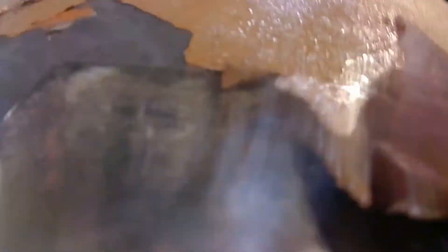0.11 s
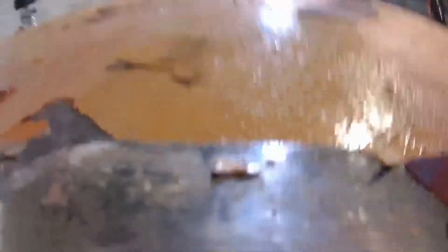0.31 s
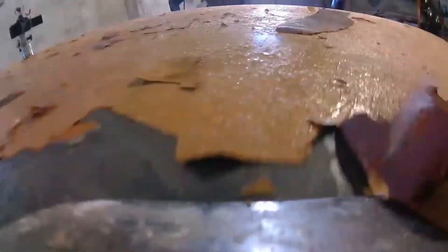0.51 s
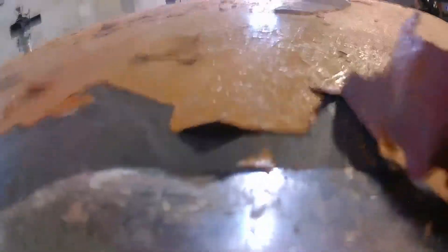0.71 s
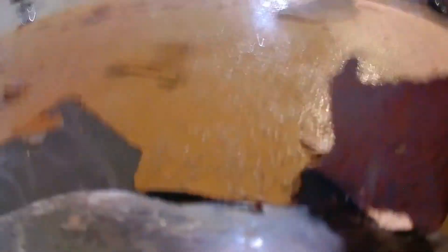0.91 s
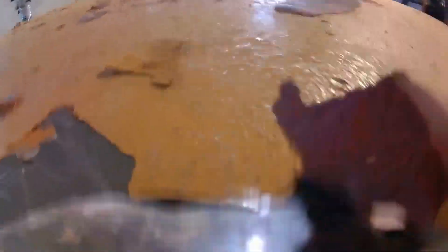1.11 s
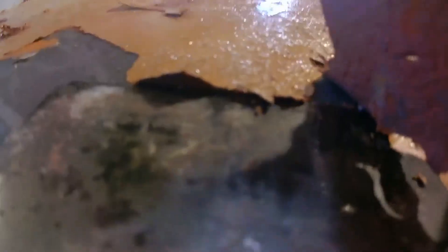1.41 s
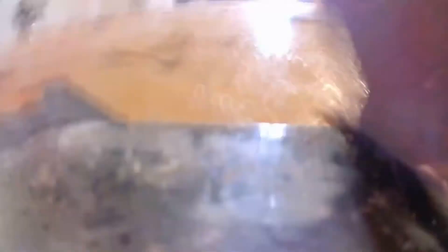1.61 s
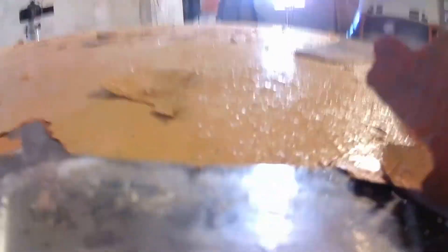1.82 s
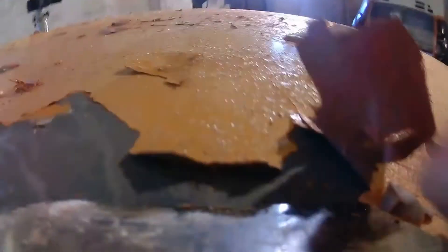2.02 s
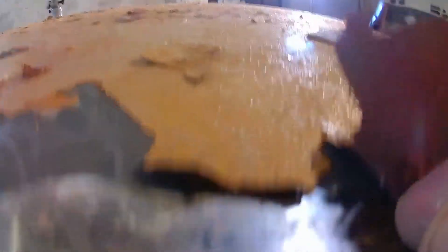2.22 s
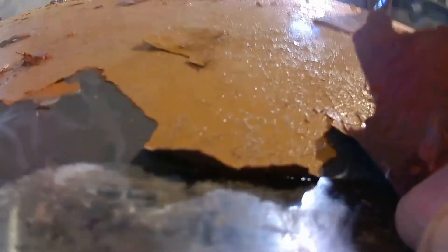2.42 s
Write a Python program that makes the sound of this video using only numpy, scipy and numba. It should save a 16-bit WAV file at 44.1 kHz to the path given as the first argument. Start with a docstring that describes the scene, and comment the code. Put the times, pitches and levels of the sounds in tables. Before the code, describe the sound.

A wide metal scraper shoved in short rough strokes over a steel car roof, chipping old paint

```python
"""A wide metal scraper is shoved in four short strokes over a steel car roof, chipping off old paint:
random fractures excite the modes of blade and panel while the edge catches, slips and judders.
Snaps are decaying noise bursts, knocks are damped oscillations, and groans are rough gliding tones.
Soft rubbing and handling rumble lie beneath. The microphone rides on the tool, so jolts reach it
directly and the strong ones overload it."""
import sys
import numpy as np
from scipy import signal
from scipy.fft import rfft, irfft
from scipy.io import wavfile
from scipy.ndimage import uniform_filter1d
from numba import njit

SR = 44100
rng = np.random.default_rng(int(sys.argv[2]) if len(sys.argv) > 2 else 0)


def wav_record(signal):
    """Record a signal, one row per channel, as 16-bit PCM in the file named by sys.argv[1]."""
    frames = np.transpose(np.atleast_2d(signal))
    bounded = np.clip(frames, -1, 1)
    # unit amplitude maps onto the largest positive 16-bit level
    quanta = np.round(bounded * 32767).astype(np.int16)
    wavfile.write(sys.argv[1], SR, quanta)


N = 112455
T = np.arange(N) / SR

# Levels in the tables are relative: trims, colouring and overload follow.
# Light sliding of the blade: (time [s], rubbing level [dB], handling rumble level [dB])
SLIDING_LEVELS = [(0,-59,-56),(.02,-61,-39),(.032,-52,-39),(.11,-50,-42),(.145,-42,-41),(.19,-47,-45),(.38,-63,-67),(.95,-74,-41),(.98,-36,-24),(1.055,-42,-31),(1.1,-68,-44),(1.17,-64,-55),(1.195,-49.5,-23),(1.27,-48,-36.5),(1.34,-55,-52),(1.375,-55.5,-49),(1.415,-48.5,-43),(1.48,-65,-54.5),(1.535,-51,-36.5),(1.555,-41.5,-38),(1.62,-49.5,-42.5),(2.33,-63,-42.5),(2.37,-64.5,-48),(2.44,-62,-50.5),(2.48,-53,-47),(2.55,-59,-54)]
# Groans of the roof panel in the second and third strokes, one list each:
# (time [s], pitch [Hz], level [dB])
PANEL_GROANS = [
    [(.47,400,-61),(.494,366,-22.5),(.51,328,-50),(.53,299,-22),(.555,293,-29.5),(.6,266,-30),(.635,286.6,-28),(.66,280,-27),(.7,264,-65)],
    [(2.045,270,-30),(2.058,296.6,-42),(2.082,417,-28.5),(2.11,440,-49)],
]
# Jolts of the tool against the roof:
# (time [s], level [dB], pitch [Hz], t60 [s], roof ring level [dB])
TOOL_KNOCKS = [(0.15,-29,160,0.15,-61),(0.201,-6.5,174.8,0.08,-19),(0.22,-10,83.4,0.22,-20.5),(0.603,-18,165,0.036,-37),(0.626,-11,114,0.049,-33),(0.795,-18.5,140,0.14,-34),(0.852,-7,130,0.043,-16),(0.872,-4,69.6,0.082,-66),(.992,15,227,0.024,-16),(1.021,-4.5,140,0.027,-28),(1.211,2,251.5,0.027,-28.5),(1.224,-15.5,75,0.036,-60),(1.247,-24,370,0.052,-53),(1.273,-20.5,80,0.058,-46),(1.59,-10.5,131,0.07,-38),(1.678,-3.5,174,0.02,-17),(2.072,-17.5,200,0.042,-21.5),(2.269,-3.5,125,.03,-37.5),(2.32,-27,80,0.11,-43.5),(2.487,-31.5,90,.14,-62)]
# Snapping flakes and clicks of the edge on bare steel: (time [s], level [dB], band centre [Hz])
FLAKE_SNAPS = [(0.028,-33.5,3660),(0.203,-11,4040),(0.332,-26.5,2570),(.603,-25,1770),(0.62,-9.5,3740),(0.625,-34,3240),(0.986,-25.5,4600),(1.024,-30,1500),(1.188,-21.5,6050),(1.505,-38,4550),(1.548,-32,2480),(1.588,-18,1400),(1.639,-25.5,2200),(1.66,-24,2400),(1.827,-24,2000),(1.836,-22.5,1480),(1.847,-22,1980),(2.073,-21.5,1500),(2.083,-37,1210),(2.167,-29.5,1910)]
# Scraping strokes, one list each:
# (time [s], paint grit level [dB], roof panel level [dB], judder level [dB])
STROKE_LEVELS = [
    [(0.19, -33, -41, -52), (0.204, -27, -39, -12), (0.218, -32, -23, -40), (0.262, -27, -22, -23),
     (0.284, -29.5, -41, -23), (0.294, -31, -29.5, -22), (0.314, -39, -50, -30.5), (0.33, -40, -33, -30),
     (0.354, -38, -54, -42), (0.374, -55, -47, -50), (0.382, -62, -39, -65), (0.39, -40, -58, -65)],
    [(0.39, -51, -40, -54), (0.456, -37.5, -39, -39), (0.488, -31, -28.5, -31), (0.598, -36, -34.5, -26),
     (0.628, -27, -25, -26), (0.648, -35.5, -41, -26.5), (0.698, -38.5, -40, -37), (0.798, -27.5, -29, -16),
     (0.806, -24, -20, -23), (0.84, -23.5, -28.5, -20), (0.874, -30.5, -43, -9.5), (0.886, -55, -52, -15),
     (0.94, -50.5, -42, -73)],
    [(1.625, -38, -35, -30), (1.649, -35.5, -33, -42), (1.683, -29, -34, -16), (1.733, -21.5, -20, -15.5),
     (1.771, -36, -48, -19.5), (1.797, -41, -47, -51), (1.845, -41, -30, -52), (1.881, -40, -52, -65),
     (1.917, -30, -28.5, -37.5), (1.997, -25, -30, -50), (2.035, -44, -42, -57), (2.083, -33.5, -53, -33),
     (2.13, -61, -81, -60)],
    [(2.13, -41.5, -48, -39), (2.158, -47.5, -39, -36), (2.168, -30.5, -32, -28), (2.178, -47, -28, -27.5),
     (2.202, -33.5, -37, -49), (2.228, -29, -29, -28), (2.254, -26.5, -25.5, -44),
     (2.27, -29.5, -25.5, -13), (2.286, -50, -56, -29.5), (2.304, -54.5, -52, -60), (2.338, -55, -58, -53),
     (2.36, -82, -65, -61)],
]
# Two narrow edge resonances that shift with the blade's angle:
# (time [s], first frequency [Hz], second frequency [Hz], level of the second [dB])
EDGE_RESONANCES = [(.205,1380,3900,-9),(.24,1360,2940,-18),(.28,1950,4300,-9),(.48,2280,4190,-3.5),(.53,2540,3960,-4),(.63,2580,4220,-3.5),(.7,1513,4300,-27),(.86,1390,4100,-18),(1.7,1950,4100,-1),(1.76,1450,2760,-24),(1.86,1330,4040,5),(1.919,2050,4200,-3.5),(1.95,2300,4130,-3),(1.97,2670,3350,-11),(2.0,2570,3380,-2),(2.18,2436,1420,-31),(2.26,2300,1510,-4)]
# Ringing modes of the blade: (frequency [Hz], level [dB], t60 [s])
BLADE_MODES = [(1364,-5,0.03),(1472,7,0.042),(1598,-20,0.3),(1636,-11,0.2),(1917,9.5,0.17),(2122,7,0.07),(2155,6,0.11),(2545,-5,0.088),(2758,6.5,0.12),(2933,-18,0.027),(3250,1.5,0.079),(4257,-5.5,0.12),(5370,13,0.03),(5840,15.5,0.15)]
# Ringing modes of the roof panel: (frequency [Hz], level [dB], t60 [s])
PANEL_MODES = [(390,-1.5,0.031),(568,-3.5,0.088),(687.4,-5.5,0.084),(832,0.5,0.056),(914,-7,0.062),(1012.5,3,0.08),(1204,-6,0.13),(1318,-0.5,0.085)]
# Spectrum of breaking paint: (frequency [Hz], spectral density [dB])
GRIT_COLOUR = [(150,-16),(500,-4),(1050,-3.5),(1400,6.5),(1780,-8),(2400,-2),(3100,-0.5),(4400,-3),(5100,-10.5),(5800,-23.5),(6300,-14),(10000,-24),(12000,-21),(15500,-46)]
# Spectrum of soft rubbing: (frequency [Hz], spectral density [dB])
RUB_COLOUR = [(200,11),(450,0.5),(1050,0),(1500,9),(1790,-13),(2050,-4),(3050,-1),(3350,-7),(3650,1),(4400,0),(5200,-15),(6300,-23),(12000,-20.5),(15500,-37)]
# Spectrum of the roof panel: (frequency [Hz], spectral density [dB])
ROOF_COLOUR = [(100,-14.5),(280,2),(450,7.5),(700,-3),(950,-6),(1400,-1),(1900,-28),(5000,-40.5)]
# Spectrum of the tool's low shaking: (frequency [Hz], spectral density [dB])
JUDDER_COLOUR = [(15,-32),(35,-4),(70,1),(120,4.5),(200,-3),(300,-12),(500,-29.5),(1500,-72)]
# Microphone response, weak in one treble band: (frequency [Hz], gain [dB])
MICROPHONE_RESPONSE = [(6380,0),(6470,-11),(6700,-17),(9400,-18),(9600,0),(13000,0),(15500,-5)]
# Stereo spread: (frequency [Hz], side relative to mid [dB])
STEREO_WIDTH = [(100,-62.5),(2500,-57),(5000,-20.5),(8000,-6.5),(12000,-14),(15000,4.5)]

GRIT_DB, RASP_DB, ROOF_DB, JUDDER_DB = 1, -3.5, -1, -3   # trims of the scraping layers
RUB_DB, HANDLING_DB = 1.5, -4.5   # trims of the sliding layers
BLADE_DB, BLADE_WASH_DB, BLADE_WASH_T60_S = -7, 6, 0.085   # modes and wash of the blade
PANEL_DB, ROOF_WASH_DB, ROOF_T60_S = -20, -8.5, 0.093   # modes and wash of the roof panel
GRAINS_PER_S, GRAIN_SPREAD_DB = 2400, 3   # tiny fractures of the paint
CATCH_HZ, CATCH_DB = 130, 3   # corner rate and spread of the catching and slipping
RASP_WIDTH_HZ = 144
GROAN_WANDER, GROAN_ROUGH_DB = 0.019, 2   # pitch spread as a fraction, level spread
SNAP_DECAY_S, SNAP_DB, SNAP_RING_DB = 0.0016, 1, -2
KNOCK_ATTACK_S, KNOCK_LOW_CUT_HZ = 0.0012, 63
OVERTONE_RATIO, OVERTONE_DB = 1.703, -11.5
ECHO_S, ECHO_SHARE = 0.001182, 0.48   # median delay and gain of waves from the blade's far end
ECHO_WANDER, ECHO_WANDER_HZ = 0.2, 3.08   # spread of the log delay and its corner rate
OVERLOAD = 0.2   # amplitude ceiling of the microphone
SCATTER_S, CUTOFF_HZ = 0.04, 15700


def from_db(db):
    """Logarithmic level: 20 dB is a factor of ten in amplitude."""
    return 10 ** (np.asarray(db) / 20)


def rms_one(x):
    """Power normalisation: the root mean square becomes 1."""
    return x / np.sqrt(np.mean(x ** 2) + 1e-20)


def energy_one(x):
    """Energy normalisation: a unit-energy response keeps the power of white noise."""
    return x / np.sqrt(np.sum(x ** 2))


def levels(rows):
    """Amplitude envelopes: levels are interpolated in dB, with silence outside the rows."""
    s, *columns = np.transpose(rows)
    inside = (T >= s[0]) * (T < s[-1])
    return [from_db(np.interp(T, s, column)) * inside for column in columns]


def through(x, response):
    """Linear superposition: a sound is convolved with a response."""
    return signal.fftconvolve(x, response)[:N]


def colour(points, size=8192):
    """Minimum phase: a folded cepstrum gives a causal response with the given spectrum."""
    hz, db = np.transpose(points)
    grid = np.maximum(np.arange(size // 2 + 1) * SR / size, 1)
    magnitude = from_db(np.interp(np.log(grid), np.log(hz), db))
    cepstrum = irfft(np.log(magnitude))
    cepstrum[1:size // 2] *= 2
    cepstrum[size // 2 + 1:] = 0
    return irfft(np.exp(rfft(cepstrum)))


def equalise(x, points):
    """Zero-phase filtering: the spectrum is scaled and its phase is kept."""
    hz, db = np.transpose(points)
    grid = np.arange(N + 1) * SR / (2 * N)
    gain = from_db(np.interp(grid, hz, db))
    return irfft(rfft(x, 2 * N) * gain)[:N]


def drift(rate):
    """Low-pass noise: a double pole smooths a random wander, scaled to spread 1."""
    r = np.exp(-2 * np.pi * rate / SR)
    noise = rng.standard_normal(N + SR)
    return rms_one(signal.lfilter([1], [1, -2 * r, r * r], noise)[SR:])   # drop the run-in


def sheet(modes, modes_db, wash_t60, wash_db):
    """Modal superposition in sheet steel: contact, strong modes and a dying wash of weak ones."""
    t = T[:SR // 3]
    wash = energy_one(rng.standard_normal(len(t)) * from_db(-60 * t / wash_t60))
    response = from_db(wash_db) * wash
    response[0] += 1   # the direct contact
    rings = sum(from_db(db - 60 * t / t60) * np.cos(2 * np.pi * hz * t) for hz, db, t60 in modes)
    return energy_one(energy_one(response) + from_db(modes_db) * energy_one(rings))


def grains():
    """Random impulse process: tiny fractures at random moments, mostly small, a few large."""
    spread = np.minimum(rng.exponential(1, N), 4)
    sizes = from_db(GRAIN_SPREAD_DB * spread) * rng.choice([-1, 1], N)
    return rms_one(sizes * (rng.random(N) < GRAINS_PER_S / SR))


def rumble(size=900):
    """Coloured noise of constant power: low shaking divided by its own running rms."""
    x = through(rng.standard_normal(N), colour(JUDDER_COLOUR))
    return x / np.sqrt(uniform_filter1d(x ** 2, size) + 1e-20)


def sliding(blade):
    """Light friction: fine grains excite the unloaded blade and the handle rumbles."""
    rub, handling = levels(SLIDING_LEVELS)
    rubbing_response = energy_one(through(blade, colour(RUB_COLOUR)))
    rubbing = through(rub * grains(), rubbing_response)
    return from_db(RUB_DB) * rubbing + from_db(HANDLING_DB) * handling * rumble()


def groan(rows):
    """Stick-slip oscillation: the panel is held in a rough, gliding note."""
    s, hz, db = np.transpose(rows)
    pitch = np.interp(T, s, hz) * (1 + GROAN_WANDER * drift(CATCH_HZ))
    gain, = levels(np.transpose([s, db]))
    roughness = from_db(GROAN_ROUGH_DB * drift(CATCH_HZ))
    return gain * roughness * np.sin(2 * np.pi * np.cumsum(pitch) / SR)


def knocks(roof):
    """Damped oscillation: each jolt swings the tool and leaves the roof ringing."""
    swing, ring = np.zeros(N), np.zeros(N)
    for s, db, hz, t60, ring_db in TOOL_KNOCKS:
        age = np.maximum(T - s, 0)
        attack = 1 - np.exp(-age / KNOCK_ATTACK_S)
        phase = 2 * np.pi * hz * age
        tone = np.sin(phase) + from_db(OVERTONE_DB) * np.sin(OVERTONE_RATIO * phase)
        swing += attack * from_db(db - 60 * age / t60) * tone
        ring += attack * from_db(ring_db - 60 * age / ROOF_T60_S)
    low_cut = signal.butter(2, KNOCK_LOW_CUT_HZ, "high", fs=SR, output="sos")
    swing = signal.sosfilt(low_cut, swing)
    return swing + through(ring * rng.standard_normal(N), roof)


def snaps(blade):
    """Impulsive excitation: a fracture burst of a few milliseconds also rings the blade."""
    t, bursts = T[:SR // 40], np.zeros(N + SR)
    for s, db, hz in FLAKE_SNAPS:
        band = signal.butter(1, [hz / 2, min(hz * 2, SR / 2 - 1)], "band", fs=SR)
        fracture = rms_one(signal.lfilter(*band, rng.choice([-1, 1], len(t))))
        start = int(s * SR)
        bursts[start:start + len(t)] += from_db(db + SNAP_DB) * fracture * np.exp(-t / SNAP_DECAY_S)
    crack = through(bursts[:N], colour(GRIT_COLOUR))
    return crack + from_db(SNAP_RING_DB) * through(crack, blade)


def reflect(x):
    """Comb interference: an echo inside the blade cuts hollows that move with the contact point."""
    lag = ECHO_S * np.exp(ECHO_WANDER * drift(ECHO_WANDER_HZ))
    echo = np.interp(T - lag, T, x)
    return (x + ECHO_SHARE * echo) / np.hypot(1, ECHO_SHARE)


@njit
def resonate(x, angle, r):
    """Time-varying resonance: a pole pair whose angle moves and whose radius is fixed."""
    y = np.zeros(len(x))
    for i in range(2, len(x)):
        y[i] = x[i] - x[i - 2] + 2 * r * np.cos(angle[i]) * y[i - 1] - r * r * y[i - 2]
    return y


def rasp(drive):
    """Formant filtering: two narrow edge resonances shift as the blade tilts."""
    s, *columns = np.transpose(EDGE_RESONANCES)
    first_hz, second_hz, second_db = [np.interp(T, s, column) for column in columns]
    r = np.exp(-np.pi * RASP_WIDTH_HZ / SR)
    first = rms_one(resonate(drive, 2 * np.pi * first_hz / SR, r))
    second = rms_one(resonate(drive, 2 * np.pi * second_hz / SR, r))
    return first + from_db(second_db) * second


def scraping(blade, roof):
    """Stick-slip and fracture: breaking paint drives blade and roof while the tool judders."""
    grit, panel, judder = np.sum([levels(stroke) for stroke in STROKE_LEVELS], axis=0)
    catch = rms_one(from_db(CATCH_DB * drift(CATCH_HZ)))
    grit_response = energy_one(through(blade, colour(GRIT_COLOUR)))
    edge = from_db(GRIT_DB) * through(reflect(grit * catch * grains()), grit_response)
    edge += from_db(RASP_DB) * grit * rasp(catch * grains())
    panel_sound = through(reflect(panel * catch * grains()), roof)
    return edge + from_db(ROOF_DB) * panel_sound + from_db(JUDDER_DB) * judder * rumble()


def scene():
    """Superposition: all sources reach the microphone through the tool, in the centre."""
    blade = sheet(BLADE_MODES, BLADE_DB, BLADE_WASH_T60_S, BLADE_WASH_DB)
    panel = sheet(PANEL_MODES, PANEL_DB, ROOF_T60_S, ROOF_WASH_DB)
    roof = energy_one(through(panel, colour(ROOF_COLOUR)))
    tool = sliding(blade) + sum(map(groan, PANEL_GROANS)) + knocks(roof)
    tool += snaps(blade) + scraping(blade, roof)
    return np.array([tool, tool])


def record(dry):
    """Saturation and filtering: jolts flatten, treble is coloured and spread, the top is cut."""
    x = dry.mean(axis=0) / OVERLOAD
    clipped = OVERLOAD * x / (1 + x ** 6) ** (1 / 6)
    mid = equalise(clipped, MICROPHONE_RESPONSE)
    scatter = energy_one(rng.standard_normal(int(SCATTER_S * SR)))
    side = equalise(through(mid, scatter), STEREO_WIDTH)
    top_cut = signal.ellip(10, .05, 60, CUTOFF_HZ, fs=SR, output="sos")
    return signal.sosfiltfilt(top_cut, [mid + side, mid - side])


dry = scene()
out = record(dry)
wav_record(out)
```